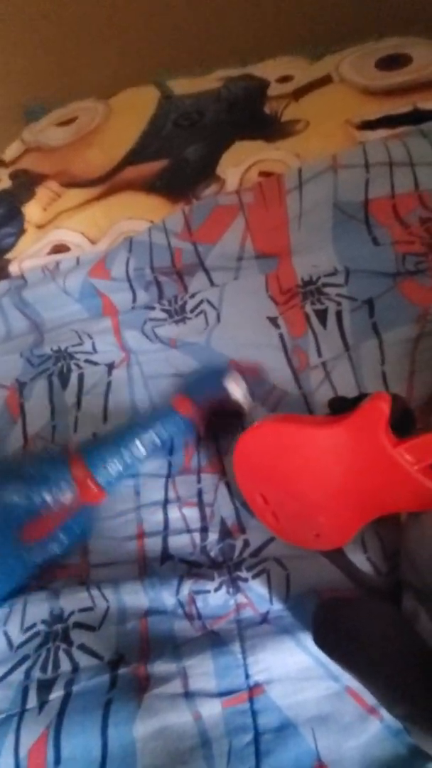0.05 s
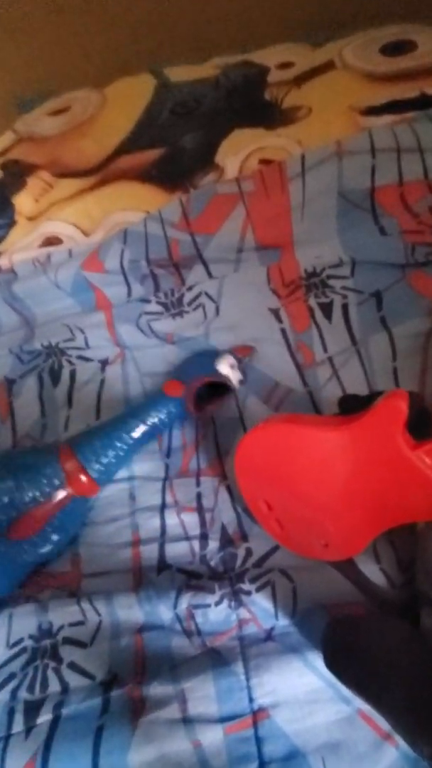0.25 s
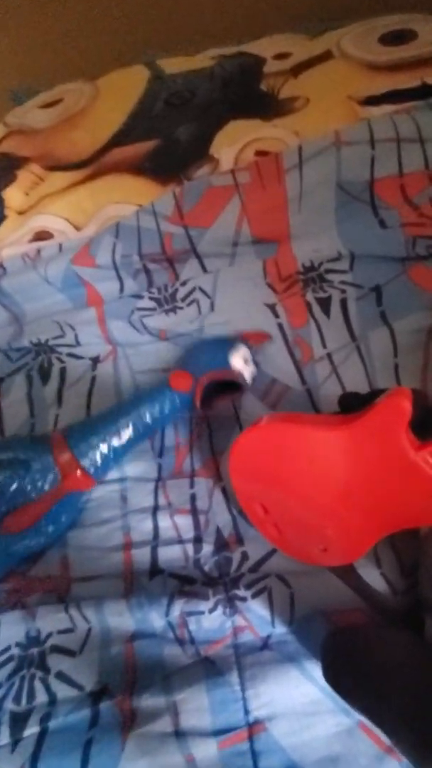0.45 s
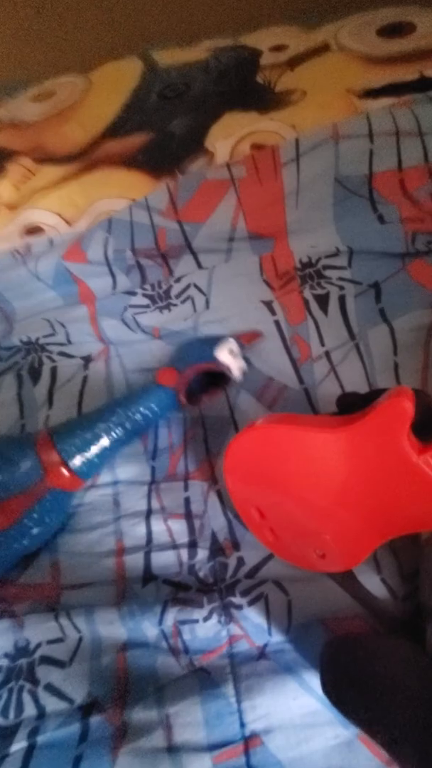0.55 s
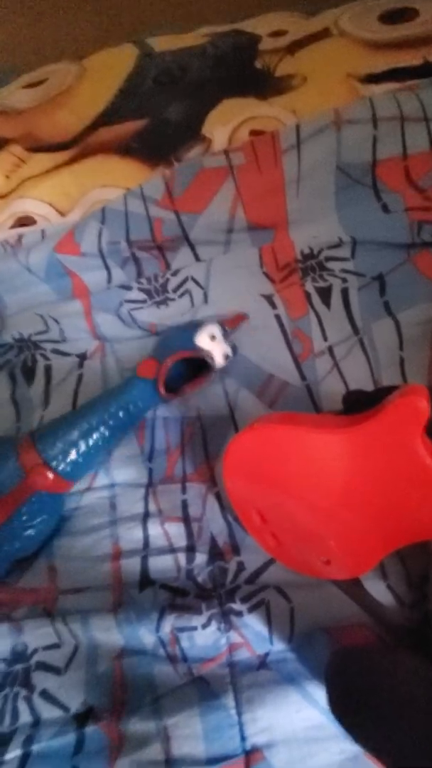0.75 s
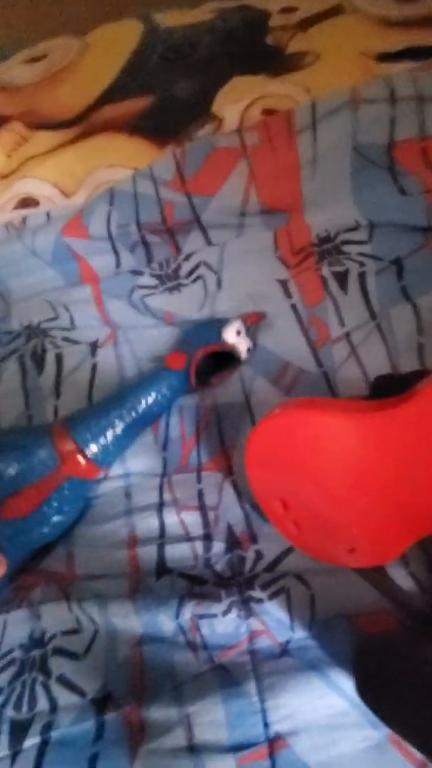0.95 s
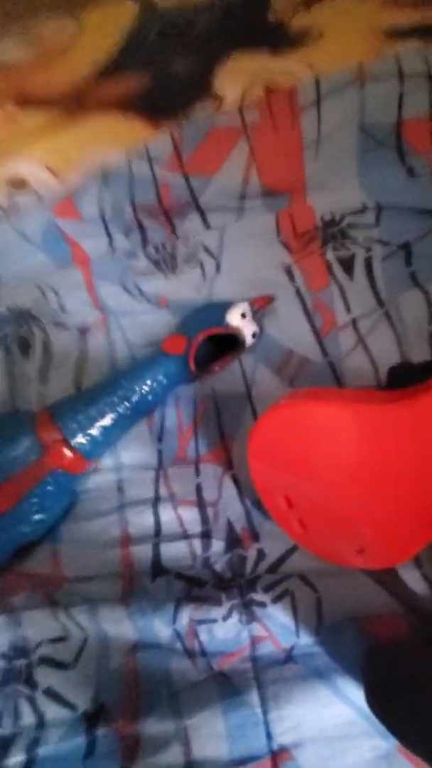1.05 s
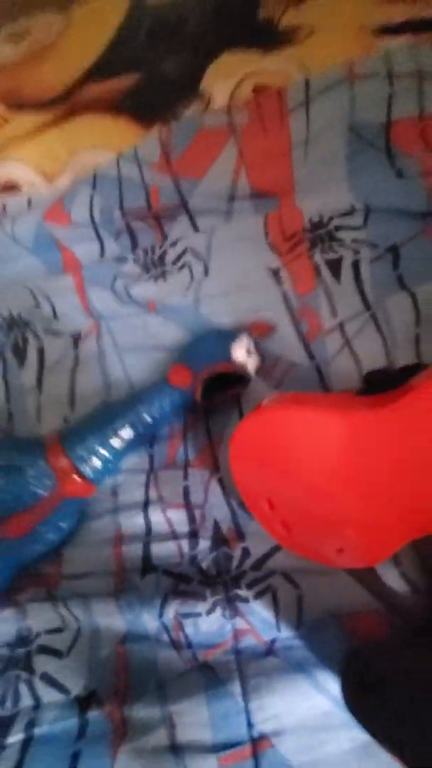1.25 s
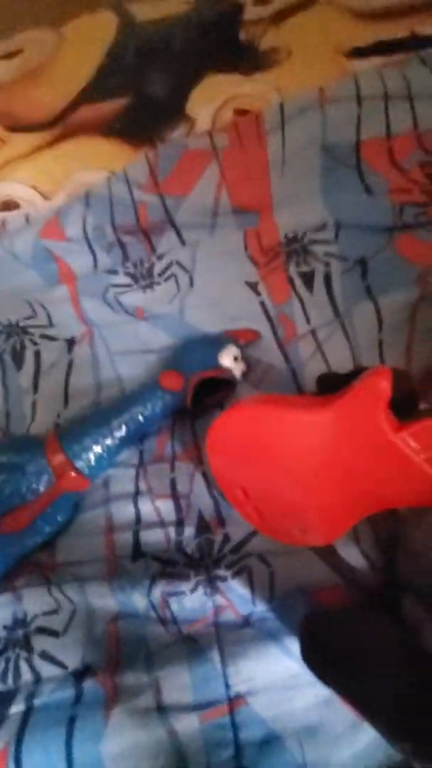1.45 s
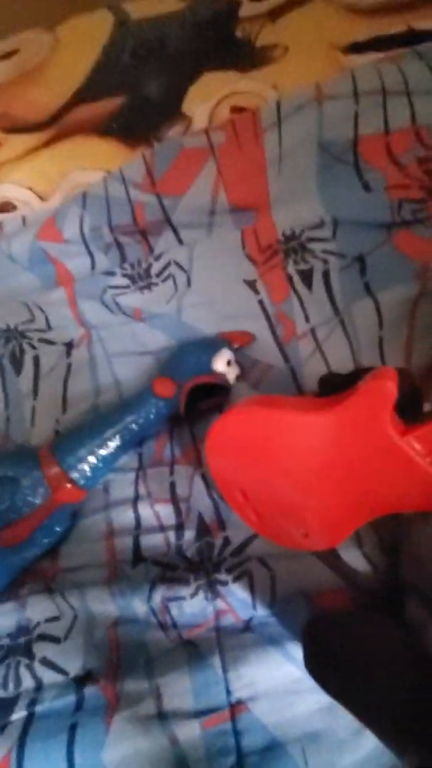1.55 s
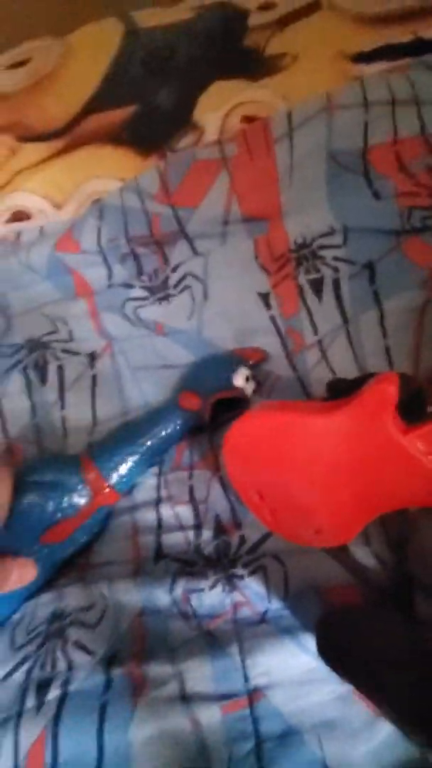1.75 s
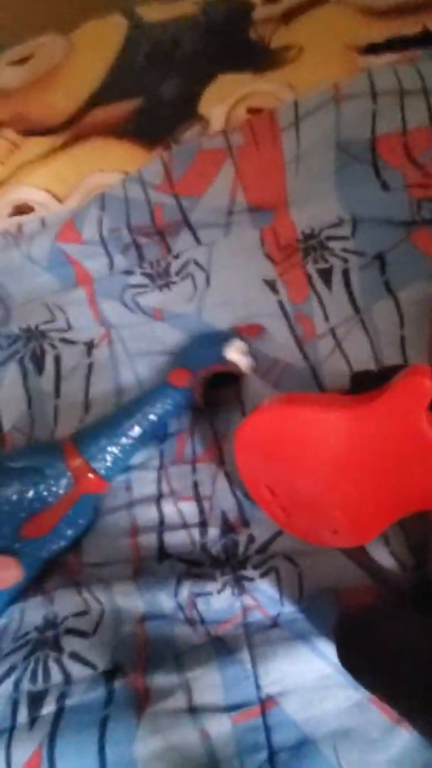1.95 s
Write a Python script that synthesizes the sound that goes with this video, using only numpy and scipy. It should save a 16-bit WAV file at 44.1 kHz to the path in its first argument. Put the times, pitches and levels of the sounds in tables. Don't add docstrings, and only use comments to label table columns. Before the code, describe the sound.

A rubber squeaky toy gives one falling squeak, pauses with creaks, then squeaks rapidly several times

```python
import sys
import numpy as np
from scipy import signal
from scipy.fft import rfft, irfft, next_fast_len
from scipy.io import wavfile
from scipy.ndimage import uniform_filter1d, minimum_filter1d

SR = 44100
rng = np.random.default_rng(int(sys.argv[2]) if len(sys.argv) > 2 else 0)


def volts_from_decibels(level):
    exponent = np.asarray(level, float) / 20
    return 10 ** exponent


def pcm_store(signal):
    levels = np.round(np.clip(np.atleast_2d(signal), -1, 1) * 32767)
    wavfile.write(sys.argv[1], SR, levels.astype(np.int16).T)


N = 88200

# time_s, pitch_hz, level_db
SQUEEZES = [
    [(0.187, 432.9, -12.5), (0.195, 443, -12), (0.217, 452.2, -11), (0.25, 439.7, -12), (0.281, 422, -14.5),
     (0.292, 393, -17), (0.305, 376.6, -21), (0.316, 367.4, -27.5)],
    [(0.993, 452.7, -20), (1.001, 469.8, -16.5), (1.051, 473, -15.5), (1.085, 464.5, -18),
     (1.101, 450, -20.5), (1.112, 406, -25)],
    [(1.153, 431.8, -20), (1.157, 438, -13.5), (1.177, 465.8, -12.5), (1.203, 477, -14),
     (1.229, 469.7, -12), (1.289, 423.6, -18), (1.297, 404, -19.5), (1.313, 394, -20)],
    [(1.387, 473.2, -4.5), (1.429, 527.3, -15.5), (1.465, 515.5, -14), (1.495, 496, -15),
     (1.527, 469, -16.5), (1.548, 467.3, -20), (1.56, 419, -28)],
    [(1.585, 432.3, -18.5), (1.597, 459, -15.5), (1.615, 494.3, -14), (1.637, 506.4, -13.5),
     (1.667, 502, -13.5), (1.713, 457, -17), (1.723, 446, -14.5), (1.74, 411.6, -21)],
    [(1.791, 468.8, -15.5), (1.825, 506.8, -13.5), (1.845, 509.3, -12.5), (1.88, 492, -16),
     (1.913, 476.5, -16), (1.945, 461.3, -22), (1.957, 419, -29)],
]
# time_s, pitch_hz, level_db
LAST_SQUEEZE = [
    (1.988, 418.2, -15.5),
    (1.994, 447, -16.5),
    (2.01, 471, -16),
]
# lowest_mode_db, mouth_db, top_db, left_over_right_db plus 9 (the left side
# is louder by this value less 9 dB)
AIM = [(-22.5, -2, 3, 10), (10.5, 8, 4.5, 10), (14, 6.5, 12, 12.5), (1, 5, 4, 11), (4, 2, 8, 10.5),
       (-2.5, -1.5, -1.5, 10), (-19, -8.5, -4, 10)]
# pitch_hz, width_hz, level_db, right_db, change_inward_db
NECK_MODES = [(528, 39.6, -7, -11, 1.5), (833, 320, 3.5, -1, 8), (1350, 135.5, -0.5, -2, 6.5),
              (1890, 29, -21, 5, -12.5), (2533, 175, -27.5, 9, -7.5), (2690, 67, -25.5, 5.5, 13)]
MIDDLE_NECK_MODE = (1218.5, 249, 0.5, -1, 6.5)
MOUTH_MODES = [(4223, 252, -6.5, -6.5, -8.5), (5004, 330, -12, -7, 3), (6030, 750, -18.5, -11, 9),
               (7010, 204, -7, -16, -5.5), (8025, 576, -14.5, -3, 4.5)]
TOP_MODES = [(10410, 400, -22.5, -11, 1), (11500, 180, -30.5, -6.5, 0.97), (12860, 390, -23.5, -10, 0.99),
             (14440, 390, -29, -10.5, 0.98), (15120, 670, -21, -9, 0.98)]
# second_db, third_db, middle_db, three upper modes (db)
GRIP_DB = [(1.5, 0, 4, -1.5, -8.5, 2), (3, 0, 2, -18, 3.5, 15.5), (2.5, 0, 6, -7, -9, 10),
           (3, 0.0064, 3, -2, 1, -12), (2, 0, 5.5, -15, 14.5, -4.5), (1, 0.0074, 3, 9, 5, -6),
           (-3, 0, -0.5, 0, -8, -3.5)]
MOUTH_TURN_DB = [(-1.5, 2.5, 1.2, 3, 1), (2, -0.5, -0.95, 5, 2.1), (2.5, -2.5, -0.63, 4.5, 0.48),
                 (5.5, 1, 2.2, 2.5, 0.62), (2, 3, -3.6, 1.5, 2), (3.5, 5, 0.13, -1.5, 0.55),
                 (-2, -4, 1.3, 2, 1)]
TOP_TURN_DB = [(2.5, 0.94, -1.5, -2, 2), (-1.5, 0.92, 2, -0.83, 2.2), (0, 0.93, -1, -1.5, 2.7),
               (-2, 0.83, 4.5, 1, 5), (3, 1, 1.5, -2, 1.6), (-4, 1, 2, 1, 2), (3, 0.84, -1.5, 1, 1.3)]
MOUTH_PAN_DB = [1, 1, -1, 1, -1, 1, 1]
RIGHT_LAG_S = [0.000034, .00016, 0.00017, 0.00018, 0.00015, 0.00014, .00014]
OPEN_S = [0.0028, 0.0014, 0.00092, 0.00078, .002, 0.00089, .001]
# from_hz, to_hz, left_over_outward_db, left_over_inward_db
THIN_BANDS = [(2900, 3940, -43, -4.5), (11680, 12700, -12, -25.5), (9400, 9900, -25, -6.5)]
# time_s, level_db
AIR = [(0, -58.5), (.1, -64.5), (.18, -61), (.6, -98.5), (.88, -84.5), (.93, -59), (.97, -56), (.99, -47.5),
       (1.0, -49), (2, -45.5)]
# start_s, level_db, pitch_hz
CREAKS = [(0.3206, -24.5, 1580), (0.4305, -36, 2120), (0.471, -40, 1660), (0.496, -33, 2080),
          (0.5156, -28.5, 2070), (0.5444, -32, 2500), (0.557, -40.5, 1690), (0.6812, -47.5, 1894),
          (0.6888, -52, 1760), (0.7156, -71, 1950), (0.7317, -41.5, 1670), (0.7356, -35.5, 1930),
          (0.7412, -40, 1830), (0.7694, -67, 1760), (0.7921, -42, 3500), (0.8142, -42.5, 1950),
          (0.92, -46.5, 2133)]
# time_s, level_db
RUBBING = [(0, -98), (.26, -72), (.3, -48), (.345, -46.5), (.39, -71), (.42, -82), (.43, -44), (.54, -55.5),
           (.6, -68), (.67, -79), (.685, -68), (.74, -53), (.84, -66.5), (.9, -78), (1.27, -61),
           (1.32, -39), (1.38, -57.5), (2, -54.5)]
# pitch_hz, width_hz, level_db
SKIN_MODES = [(320.4, 350, -11), (1810, 180, 1), (2700, 60, -3), (3750, 370, -11), (5440, 170, -14),
              (7500, 4300, -22.5), (11900, 7000, -28.5)]
# start_s, level_db, pitch_hz
SNAPS = [(0.3229, -33, 4000), (0.335, -44, 12500), (0.513, -31.5, 3800), (0.545, -39, 2580),
         (0.690, -56, 3670), (0.715, -53, 3750), (0.777, -55, 4600), (0.793, -46.5, 3620),
         (0.874, -48, 3660), (0.9236, -45, 3700), (1.325, -41, 8900), (1.376, -46, 4000)]
# pitch_hz, level_db
HISS = [(47, -34.5), (80, -10), (155, -12.5), (621, -28), (965, -51.5), (1050, -50.5), (2490, -42),
        (9000, -42), (15500, -48)]

HISS_DB = -60.5
HUM_HZ, HUM_WIDTH_HZ, HUM_DB = 55.5, 11.1, -53
ROOM_T60_S, ROOM_DB, WALL_CUT_HZ = 0.29, -24, 4300
NEAR_ECHO_DB, NEAR_ECHO_LOW_HZ = -11, 2500
SNAP_T60_S, SNAP_WIDTH_SHARE = 0.012, 0.27
CREAK_T60_S, CREAK_DB = 0.022, -10.5
GRAINS_PER_S, SKIN_LOW_HZ, RUBBER_PAN_DB = 1900, 1400, -7
SAG_HZ_PER_S, SAG_INWARD_HZ_PER_S = 3000, 1225
CLOSE_S, CLOSE_INWARD_S = 0.003, 0.009
JITTER = 0.00008
LEAK_DB, NECK_LEAK_DB, TOP_LEAK_DB = -27, -15, -9
SLACK_LEAK = 1.2
AIR_DUCK_DB = -6.5
NECK_CUT_HZ = 1704
MOUTH_LAG_S = 0.00018
BRIGHT_FOLLOWS = 0.66
HIGHS_DB_PER_HZ = 0.01
POP_DB = -16.5
CUTOFF_HZ, LIMIT, LIMIT_S = 15750, 0.95, 0.004


def drift(rate):
    r = np.exp(-2 * np.pi * rate / SR)
    slow = signal.lfilter([1], [1, -2 * r, r * r], rng.standard_normal(N + SR))[SR:]
    return slow / slow.std()


def peak(x, hz, width):
    r = np.exp(-np.pi * width / SR)
    feedback = [1, -2 * r * np.cos(2 * np.pi * hz / SR), r * r]
    return signal.lfilter([(1 - r * r) / 2, 0, (r * r - 1) / 2], feedback, x + 1e-18)


def curve(rows):
    s, db = np.transpose(rows)
    return volts_from_decibels(np.interp(np.arange(N) / SR, s, db))


def pan(left_over_right_db):
    return volts_from_decibels(np.array([[1], [-1]]) * left_over_right_db / 2)


def floor():
    hz, db = np.transpose(HISS)
    f = np.arange(N // 2 + 1) * SR / N + 1
    white = rng.standard_normal((3, N))
    color = volts_from_decibels(np.interp(np.log(f), np.log(hz), db))
    hiss = irfft(rfft(white[0] + 0.58 * white[1:]) * color, N)
    hum = peak(white[1] + 0.14 * rng.standard_normal((2, N)), HUM_HZ, HUM_WIDTH_HZ)
    hum = peak(hum, HUM_HZ, 3.3 * HUM_WIDTH_HZ)
    return volts_from_decibels(HISS_DB) * hiss / hiss.std() + volts_from_decibels(HUM_DB) * hum / hum.std()


def room(x):
    size = next_fast_len(N + SR)
    f = np.arange(size // 2 + 1) * SR / size
    lags = rng.uniform(0.011, 0.057, (2, 10))
    t60 = ROOM_T60_S / np.sqrt(1 + (f / WALL_CUT_HZ) ** 2)
    out = np.zeros((2, len(f)), complex)
    for k in range(10):
        lag = lags[:, k:k + 1]
        loop = volts_from_decibels(-60 * lag / t60) * np.exp(-2j * np.pi * f * lag)
        out += (-1) ** k * loop / (1 - loop)
    return irfft(out * rfft(x, size), size)[:, :N]


def near_echoes(x):
    high = signal.butter(2, NEAR_ECHO_LOW_HZ, "high", fs=SR, output="sos")
    bright = signal.sosfilt(high, x)
    lags = (rng.uniform(0.03, 1, (2, 6)) * 0.012 * SR).astype(int)
    out = x.copy()
    for side in range(2):
        for k, lag in enumerate(lags[side]):
            gain = (-1) ** k * volts_from_decibels(NEAR_ECHO_DB - 400 * lag / SR)
            out[side, lag:] += gain * bright[side, :N - lag]
    return out


def fading_noise(start, t60, noise):
    t = np.arange(N) / SR
    return (t > start) * volts_from_decibels(-60 * np.maximum(t - start, 0) / t60) * noise


def snaps():
    out, noise = np.zeros(N), rng.standard_normal(N)
    for s, db, hz in SNAPS:
        burst = volts_from_decibels(db) * fading_noise(s, SNAP_T60_S, noise)
        out += 2 * peak(burst, hz, SNAP_WIDTH_SHARE * hz)
    return out * pan(RUBBER_PAN_DB)


def rubbing_grains():
    hits = rng.random(N) < GRAINS_PER_S / SR
    sizes = volts_from_decibels(3.0 * np.minimum(rng.exponential(1, N), 4))
    grains = hits * sizes * rng.choice([-1, 1], N)
    return grains / grains.std() * curve(RUBBING) * volts_from_decibels(3.0 * np.clip(drift(40), -2, 2))


def rubber():
    grains = rubbing_grains()
    out, slips, noise = np.zeros(N), np.zeros(N), rng.standard_normal(N)
    for s, db, hz in CREAKS:
        burst = volts_from_decibels(db + CREAK_DB) * fading_noise(s, CREAK_T60_S, noise)
        burst[int(s * SR) + 1] += volts_from_decibels(db + CREAK_DB + 2)
        slips += burst
        out += 7.6 * peak(burst, hz, 370)
    for k, (hz, width, db) in enumerate(SKIN_MODES[1:]):
        out += 4.75 * (-1) ** k * volts_from_decibels(db) * peak(grains + slips, hz, width)
    out = signal.sosfilt(signal.butter(4, SKIN_LOW_HZ, "high", fs=SR, output="sos"), out)
    hz, width, db = SKIN_MODES[0]
    out += 11.8 * volts_from_decibels(db) * peak(peak(slips + 0.21 * grains, hz, width), hz, width)
    return out * pan(RUBBER_PAN_DB)


def tube(x, modes, inward=0, alternate=True, turn_db=np.zeros(9)):
    out = 0
    for k, (hz, width, db, right_db, in_db) in enumerate(modes):
        ring = peak(peak(x, hz, 1.97 * width), hz, 1.97 * width)
        gain = (-1) ** (k * alternate) * volts_from_decibels(db + inward * in_db + turn_db[k])
        out = out + gain * ring * volts_from_decibels(np.array([[0], [right_db]]))
    return out


def late_right(x, lag):
    size = next_fast_len(x.shape[1] + 4000)
    shift = np.exp(-2j * np.pi * np.arange(size // 2 + 1) * SR / size * lag)
    return np.array([x[0], irfft(rfft(x[1], size) * shift, size)[:x.shape[1]]])


def thin_out(x, inward):
    for low_hz, high_hz, out_db, in_db in THIN_BANDS:
        left = np.clip(volts_from_decibels(in_db if inward else out_db), 0, 1)
        stop = signal.butter(1, [low_hz, high_hz], "bandstop", fs=SR, output="sos")
        x = left * x + (1 - left) * signal.sosfilt(stop, x)
    return x


def reed(pitch):
    turn = 2 * np.pi * np.cumsum(pitch) / SR
    orders = np.arange(1, 45)[:, None]
    pulses = (np.cos(orders * turn) * (orders * pitch < 16500)).sum(axis=0)
    return pulses, turn


def free_air(leak, speaking):
    air = tube(rng.standard_normal(N), [(718, 49, 6, 1.0, 0), (1270, 280, -7.5, -2.8, 0)])
    air += (np.arange(N) / SR > 0.5) * volts_from_decibels(-10.5) * tube(leak, MOUTH_MODES)
    return curve(AIR) * volts_from_decibels(AIR_DUCK_DB * speaking) * air / air.std()


def squeaks():
    t, out, speaking = np.arange(N) / SR, np.zeros((2, N)), np.zeros(N)
    wobble, noise = 1 + JITTER * drift(86), rng.standard_normal(N)
    neck_low = NECK_MODES[:3] + [MIDDLE_NECK_MODE]
    neck_cut = signal.butter(6, NECK_CUT_HZ, fs=SR, output="sos")
    for n, (rows, aim) in enumerate(zip(SQUEEZES + [LAST_SQUEEZE], AIM)):
        low_db, mouth_db, top_db, pan_db = aim
        inward = 1 - n % 2
        s, hz, db = np.transpose(rows)
        a, b = int((s[0] - 0.05) * SR), min(N, int((s[-1] + 0.11) * SR))
        u = t[a:b]
        after_end = np.maximum(u - s[-1], 0)

        sag = (SAG_INWARD_HZ_PER_S if inward else SAG_HZ_PER_S) * after_end
        pitch = uniform_filter1d(np.interp(u, s, hz) - sag, size=350) * wobble[a:b]
        pulses, turn = reed(pitch)
        fade = np.exp(-after_end / (CLOSE_INWARD_S if inward else CLOSE_S))
        gate = np.clip((u - s[0]) / OPEN_S[n], 0, 1) * fade
        speaking[a:b] = np.maximum(speaking[a:b], gate)
        level_db = uniform_filter1d(np.interp(u, s, db), size=200)

        slack_db = SLACK_LEAK * (db.max() - level_db) * (u > s[db.argmax()])
        leak = volts_from_decibels(LEAK_DB + slack_db) * noise[a:b] * (1 + np.cos(turn))

        into_neck = pulses + volts_from_decibels(NECK_LEAK_DB) * leak
        grip_db = (low_db, *GRIP_DB[n])
        body = tube(into_neck, neck_low, inward, alternate=False, turn_db=grip_db)
        body = signal.sosfilt(neck_cut, body)
        highs = volts_from_decibels(HIGHS_DB_PER_HZ * (hz.max() - pitch) * (u > s[hz.argmax()]))
        body += highs * tube(into_neck, NECK_MODES[3:], inward, turn_db=grip_db[4:])
        middle = late_right(body, RIGHT_LAG_S[n]).mean(axis=0)
        even = 1 / np.sqrt(uniform_filter1d(middle ** 2, size=600) + 1e-6)

        mouth = volts_from_decibels(mouth_db) * tube(pulses + leak, MOUTH_MODES, inward, turn_db=MOUTH_TURN_DB[n])
        into_top = pulses + volts_from_decibels(TOP_LEAK_DB) * leak
        top = volts_from_decibels(top_db) * tube(into_top, TOP_MODES, inward, turn_db=TOP_TURN_DB[n])
        bright = volts_from_decibels(BRIGHT_FOLLOWS * (level_db - db.max())) * gate * highs
        front = late_right(mouth + top, MOUTH_LAG_S) * volts_from_decibels([[0], [-MOUTH_PAN_DB[n]]])
        voice = thin_out(body + bright * front, inward) * even * gate * volts_from_decibels(level_db)

        pop = np.zeros(b - a)
        pop[int(0.051 * SR)] = 10 * volts_from_decibels(POP_DB + db.max() + 24)
        voice = voice + tube(pop, NECK_MODES[:3], alternate=False)
        direction = 1 if inward else -1
        out[:, a:b] += direction * late_right(voice, RIGHT_LAG_S[n]) * pan(pan_db - 9.0)
    return near_echoes(out + free_air(noise, speaking))


def scene():
    toy = squeaks() + rubber() + snaps()
    return toy + volts_from_decibels(ROOM_DB) * room(toy[0]) + floor()


def roll_off(x):
    return signal.sosfilt(signal.butter(12, 16810, fs=SR, output="sos"), x)


def record(dry):
    cut = signal.sosfilt(signal.cheby2(10, 40, CUTOFF_HZ * 1.03, fs=SR, output="sos"), dry)
    span = int(LIMIT_S * SR)
    gain = np.minimum(1, LIMIT / (np.abs(cut).max(axis=0) + 1e-9))
    gain = uniform_filter1d(minimum_filter1d(gain, size=2 * span), size=span)
    return roll_off(cut * gain)


dry = scene()
out = record(dry)
pcm_store(out)
```